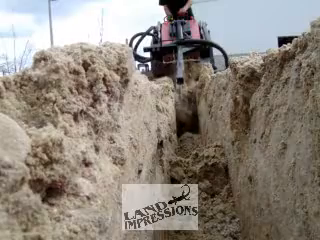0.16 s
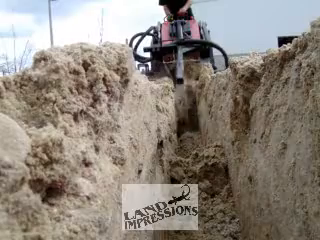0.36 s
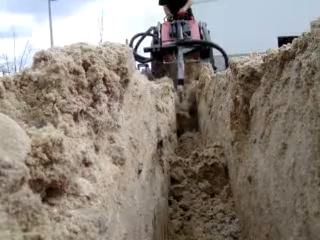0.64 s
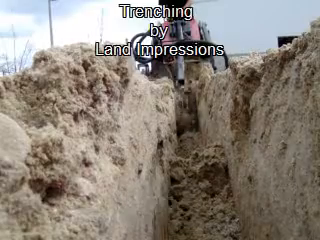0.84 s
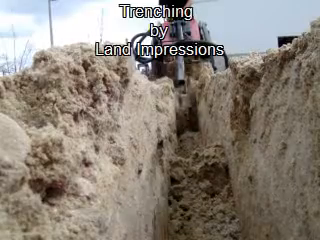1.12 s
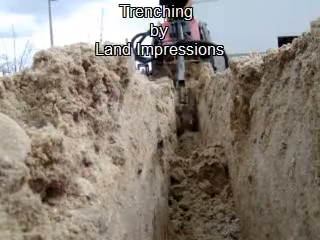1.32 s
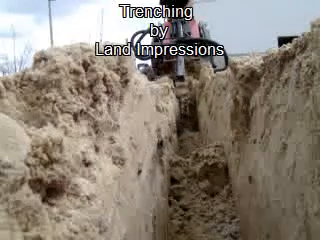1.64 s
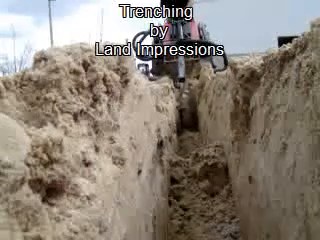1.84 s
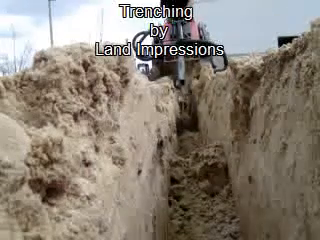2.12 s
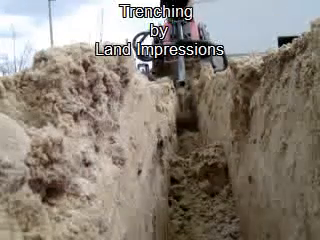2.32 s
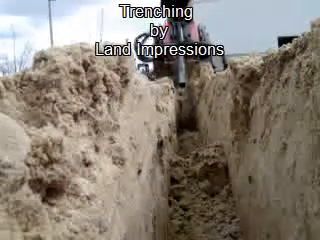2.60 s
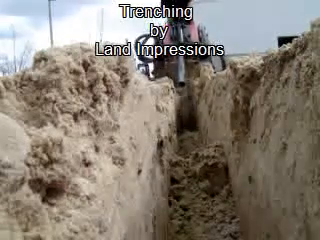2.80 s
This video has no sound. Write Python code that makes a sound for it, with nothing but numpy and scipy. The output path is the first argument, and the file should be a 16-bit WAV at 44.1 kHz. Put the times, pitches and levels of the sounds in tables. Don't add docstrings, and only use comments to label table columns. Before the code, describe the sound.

Loud lopsided engine thumping and housing clatter from a trencher, with chain and fan noise, boomy in the earth trench outdoors; a tiny skip, then a sudden drop to a quieter, smeared engine sound, on a cheap microphone.

```python
import sys
import numpy as np
from scipy import signal
from scipy.fft import rfft, irfft, next_fast_len
from scipy.io import wavfile
from scipy.ndimage import uniform_filter1d, map_coordinates

SR = 44100
rng = np.random.default_rng(int(sys.argv[2]) if len(sys.argv) > 2 else 0)


def store_wav(level_fs):
    pcm = np.round(np.clip(np.atleast_2d(level_fs), -1, 1) * 32767)
    wavfile.write(sys.argv[1], SR, pcm.T.astype(np.int16))


def gain_from_decibels(decibels):
    exponent = np.asarray(decibels, float) / 20
    return 10 ** exponent


N = 130536
TIME = np.arange(N) / SR
FIRST_LEADS = .359
KNOCK_LEADS_S = .0008
DROPOUT_S, DROPOUT_CYCLES = 1.897, .532


def unit(x):
    return x / np.sqrt(np.mean(x ** 2) + 1e-20)


def filtered(x, response):
    m = next_fast_len(N + SR // 2)
    return irfft(rfft(x, m) * response(np.fft.rfftfreq(m, 1 / SR)), m)[..., :N]


def ring(f, hz, width):
    return 1j * f * width / (hz * hz - f * f + 1j * f * width)


def wobble(rate):
    knots = rng.standard_normal(int(N * rate / SR) + 4)
    return map_coordinates(knots, [np.arange(N) * rate / SR])


def rush(points, patchy_db):
    z = signal.stft(rng.standard_normal(N), nperseg=512)[2]
    patches = uniform_filter1d(rng.standard_normal(z.shape), 6, 0)
    patches = uniform_filter1d(patches, 10, 1)
    noise = signal.istft(z * gain_from_decibels(patchy_db * unit(patches)), nperseg=512)[1][:N]
    f, db = np.transpose(points)
    colour = lambda hz: gain_from_decibels(np.interp(np.log(hz + 1), np.log(f + 1), db, -120, -120))
    return unit(filtered(noise, colour))


# time in seconds, speed in engine cycles per second.
ENGINE_SPEED = [(0.0, 24.207), (0.33, 23.682), (0.5, 24.445), (0.75, 24.469), (0.95, 23.576),
                (1.15, 24.417), (1.35, 24.729), (1.6, 24.322), (1.87, 25.499), (2.05, 24.803), (2.3, 24.2),
                (2.96, 24.2)]


def crank():
    turned = np.cumsum(np.interp(TIME, *np.transpose(ENGINE_SPEED))) / SR
    return -.377 + turned + DROPOUT_CYCLES * (TIME > DROPOUT_S)


def moments(lead):
    s = np.interp(np.arange(80), crank() + lead, TIME, -1, -1)
    in_dropout = abs(s - DROPOUT_S) <= 2 / SR
    return s[(s > 0) & ~in_dropout]


def train(s, sizes):
    return np.bincount(np.clip((s * SR).astype(int), 0, N - 1), sizes, N)


def bursts(s, sizes, width_s):
    bell = np.exp(-.5 * (np.arange(-300, 301) / SR / width_s) ** 2)
    return np.convolve(train(s, sizes), bell, "same")


# pitch in Hz, level in dB rms.
MOTOR_TONES = [(7693, -60.5), (7720, -63.5)]


def whine():
    out = 0
    for hz, db in MOTOR_TONES:
        level = np.sqrt(2) * gain_from_decibels(db + 1.5 * wobble(39))
        out = out + level * np.sin(2 * np.pi * hz * TIME + 0.52 * wobble(16))
    return out


# turns a cycle, level in dB rms, lead in cycles.
UNBALANCED_SHAFTS = [(1, -35.5, -.054), (2, -38, .19)]


def shafts():
    cycles, out = crank(), 0
    for turns, db, lead in UNBALANCED_SHAFTS:
        out = out + np.sqrt(2) * gain_from_decibels(db) * np.cos(2 * np.pi * turns * (cycles + lead))
    return out


# pitch in Hz, level in dB per Hz.
ROAR_COLOUR = [(30, -22), (110, -5.5), (210, 2.84), (330, -5.5), (600, -9), (1150, -16.5), (1550, -23),
               (1800, -40.5)]
# pitch in Hz, level in dB per Hz.
HISS_COLOUR = [(1060, -44), (1800, -23.5), (2920, -4), (3340, -3), (3870, -8.5), (7020, -15), (7980, -18.5),
               (9800, -31), (12700, -64), (21600, -120)]
# time in seconds, added level in dB.
DIGGING_LOAD = [
    (0, 2.5),
    (.25, -0.4),
    (1, -0.64),
    (1.7, 0.05),
    (2.001, 2.2),
    (2.25, 0),
    (2.96, 3.8),
]


def roar():
    between, knock = moments(FIRST_LEADS / 2), moments(0) - KNOCK_LEADS_S
    swell_db = 4 * bursts(between, np.ones(len(between)), 0.0022)
    swell_db = swell_db + np.interp(TIME, *np.transpose(DIGGING_LOAD))
    low = gain_from_decibels(-22 + swell_db + 0.99 * wobble(30)) * rush(ROAR_COLOUR, patchy_db=0.24)
    crack_size = gain_from_decibels(2.5 * wobble(14)[(knock * SR).astype(int)])
    crack = 1 + bursts(knock, crack_size, 0.0013)
    high = gain_from_decibels(-41 + swell_db + 0.2 * wobble(5.5)) * rush(HISS_COLOUR, patchy_db=1.65)
    return low + crack * high


# pitch in Hz, width in Hz, knock level in dB, rattle level in dB.
HOUSING_MODES = [(1083, 190, -19.5, -41), (2112, 520, -36, -44), (2650, 320, -33, -53.5),
                 (3302, 440, -23, -47.5), (4280, 280, -35, -51), (5870, 1100, -37.5, -50.5),
                 (7800, 390, -44, -54)]
HARD_KNOCKS = [.222, .264, .431, .473, .637, .677, .718, .8, .842, .968, 1.093, 1.134, 1.257, 1.42, 1.541,
               1.583, 1.664, 1.745, 2.042, 2.204, 2.245, 2.286, 2.37, 2.411, 2.494, 2.577, 2.659, 2.742,
               2.824, 2.866]


def housing():
    knock_s, tick_db = .0009, -13
    second, first = moments(0) - KNOCK_LEADS_S, moments(FIRST_LEADS)
    force_db = rng.standard_normal(80)
    is_hard = abs(second[:, None] - HARD_KNOCKS).min(1) < .01
    force_db[:len(second)] += 5.5 * is_hard
    out = 0
    for hz, width, knock_db, rattle_db in HOUSING_MODES:
        size = gain_from_decibels(knock_db + force_db + 2.2 * rng.uniform(-1, 1, (2, 80)))
        knocks = bursts(second, size[0, :len(second)], knock_s)
        ticks = gain_from_decibels(tick_db) * bursts(first, size[1, :len(first)], 2 * knock_s)
        shake = np.sin(2 * np.pi * np.cumsum(hz * (1 + .025 * wobble(90))) / SR)
        noise = rng.standard_normal(N) * np.sqrt(SR / (np.pi * width))
        rattle = noise * gain_from_decibels(rattle_db + 1.2 * wobble(8.3))
        out = out + filtered(shake * (knocks + ticks) + rattle, lambda f: ring(f, hz, width) ** 2)
    return out


# pitch in Hz, width in Hz, level in dB.
PIPE_MODES = [(111.6, 40, -17.9), (202, 27, -15.6), (293, 16, -19)]


def exhaust():
    thump_db, first_db, scatter_db = .1, -1.1, .6
    blow_leads_s, jitter_s, blow_s = .0065, .00012, .00144
    speed = np.mean(ENGINE_SPEED, 0)[1]
    blows = 0
    for lead, db in ((0, thump_db), (FIRST_LEADS, thump_db + first_db)):
        s = moments(lead + blow_leads_s * speed)
        late, louder = rng.standard_normal((80, 2))[:len(s)].T
        blows = blows + train(s + jitter_s * late, SR / speed * gain_from_decibels(db + scatter_db * louder))

    def pipe(f):
        modes = 0
        for k, (hz, width, db) in enumerate(PIPE_MODES):
            modes = modes + (-1) ** k * gain_from_decibels(db) * ring(f, hz, width)
        return modes / (1 + 2j * np.pi * f * blow_s) ** 2

    return filtered(blows, pipe)


def scene():
    return (exhaust() + shafts() + housing() + roar() + whine())[None]


EDIT_DB = -10.5


def smeared(x):
    block, first_seam, slip = 2048, 101827, 900
    hz, t, z = signal.stft(np.roll(x, slip), SR, nperseg=block, noverlap=block * 3 // 4)
    treble = (hz / (hz + 500))[:, None]
    steps = uniform_filter1d(rng.standard_normal(z.shape), size=2, axis=0)
    steps = steps * (t > first_seam / SR) * np.sqrt(treble)
    z = z * gain_from_decibels(3.2 * treble) * np.exp(1j * .8 * np.cumsum(steps, 1))
    y = signal.istft(z, SR, nperseg=block, noverlap=block * 3 // 4)[1][:N]
    k = np.arange(4)
    seams = train((first_seam + .5 + block * k) / SR, gain_from_decibels(-13 - 6.5 * k))
    spike = np.exp(-abs(np.arange(-200, 201)) / SR / .0001)
    return -gain_from_decibels(EDIT_DB) * y + np.convolve(seams, spike, "same")


def low_pass(x):
    return signal.sosfilt(signal.butter(12, 9950, fs=SR, output="sos"), x)


def record(dry):
    offset, top, knee = -.044, .76, 6
    x = dry[0] + offset
    x = x / (1 + abs(x / top) ** knee) ** (1 / knee)
    before = 2.29737 - TIME
    edited = smeared(x - offset) - gain_from_decibels(EDIT_DB) * offset - .14 * (before > 0)
    x = x + np.exp(-np.clip(before, 0, 1) / .001) * (edited - x)
    return low_pass(filtered(x, lambda hz: hz < 9950)[None])


dry = scene()
out = record(dry)
store_wav(out)
```